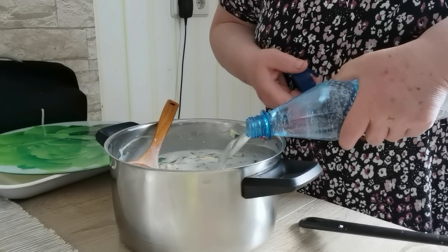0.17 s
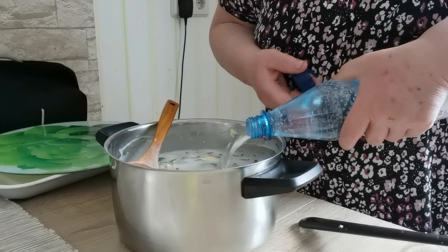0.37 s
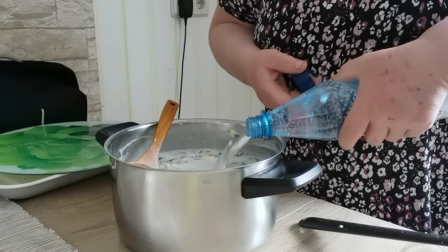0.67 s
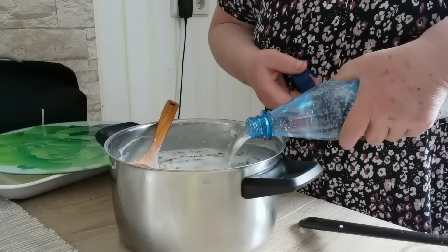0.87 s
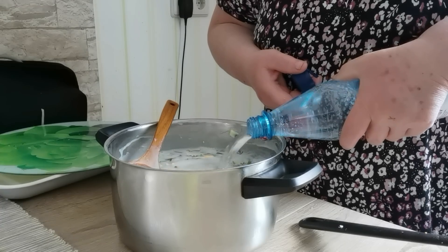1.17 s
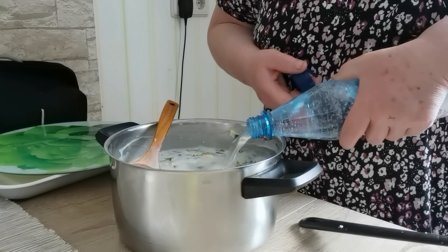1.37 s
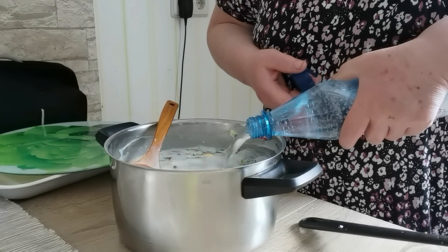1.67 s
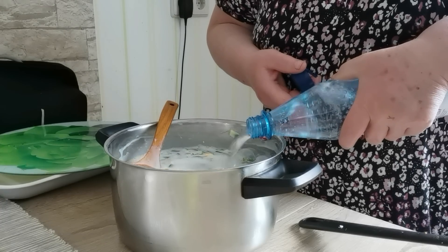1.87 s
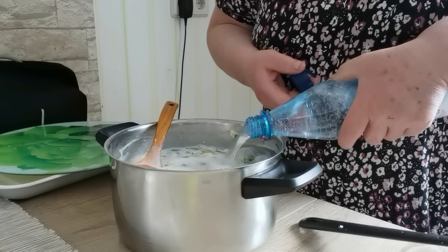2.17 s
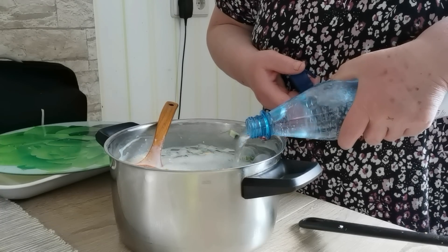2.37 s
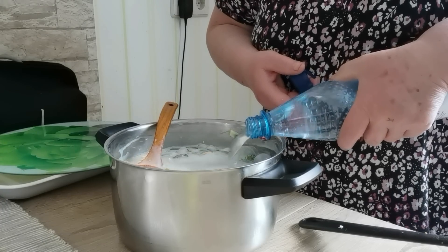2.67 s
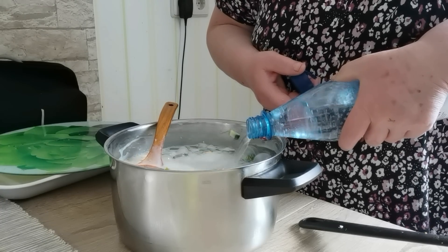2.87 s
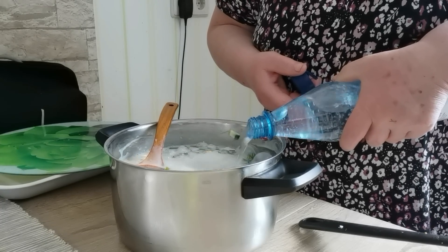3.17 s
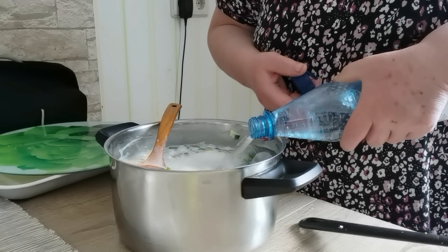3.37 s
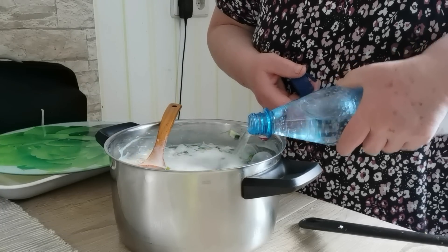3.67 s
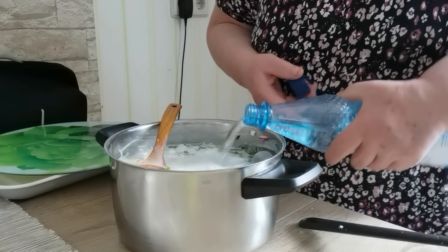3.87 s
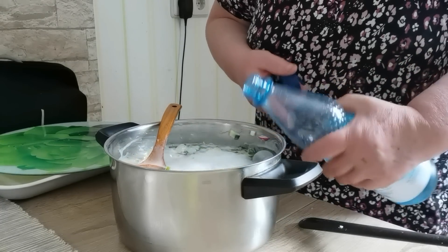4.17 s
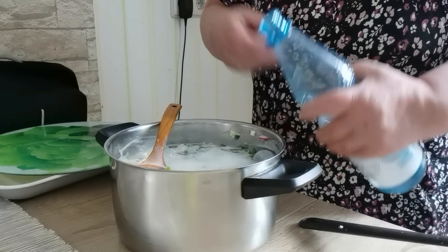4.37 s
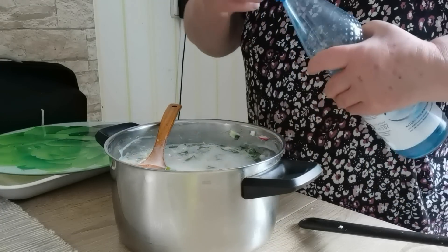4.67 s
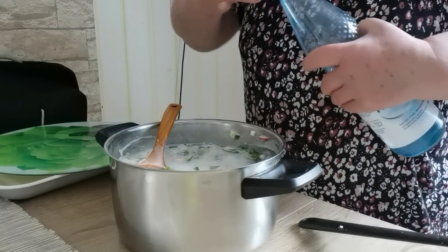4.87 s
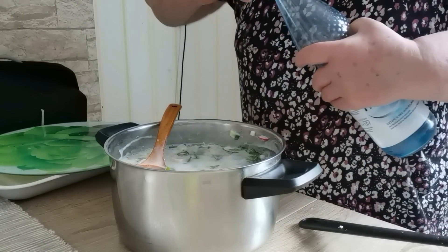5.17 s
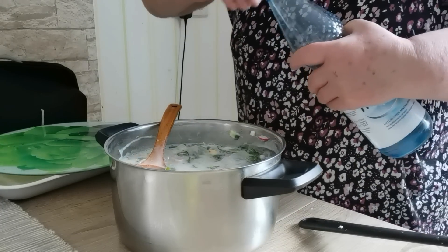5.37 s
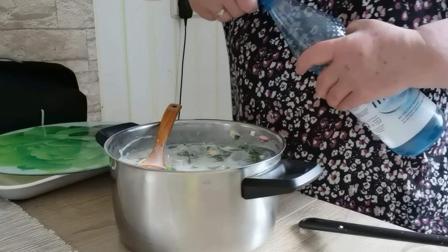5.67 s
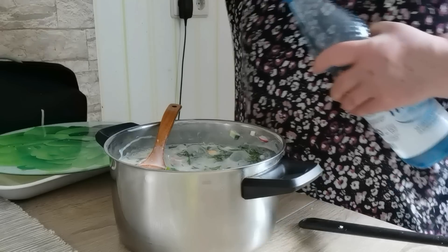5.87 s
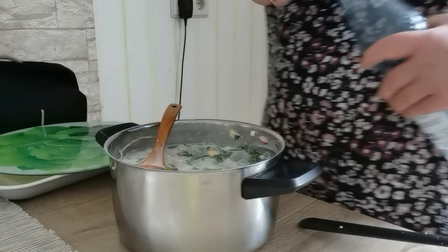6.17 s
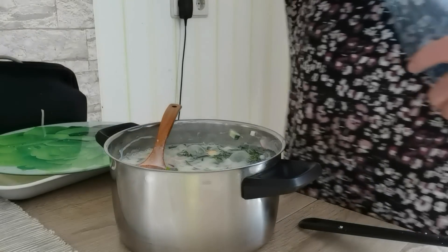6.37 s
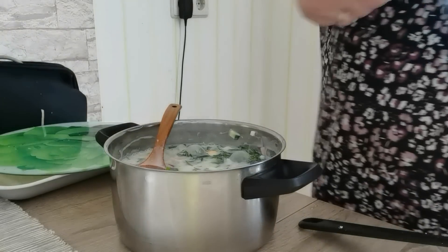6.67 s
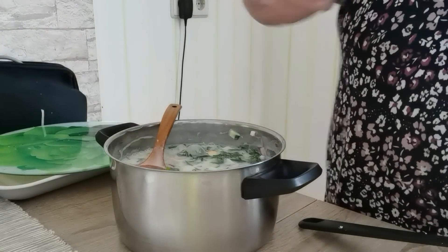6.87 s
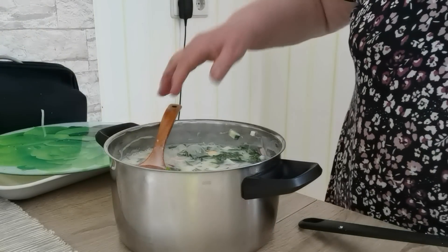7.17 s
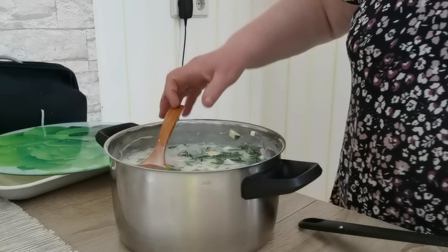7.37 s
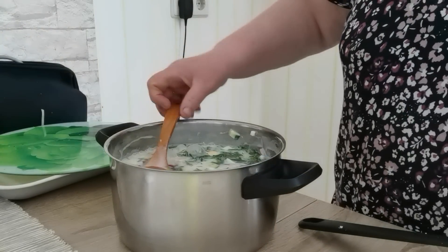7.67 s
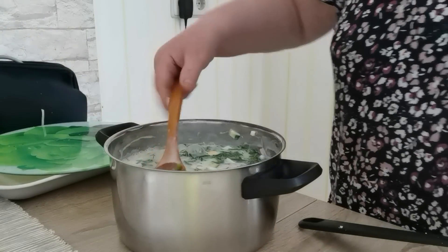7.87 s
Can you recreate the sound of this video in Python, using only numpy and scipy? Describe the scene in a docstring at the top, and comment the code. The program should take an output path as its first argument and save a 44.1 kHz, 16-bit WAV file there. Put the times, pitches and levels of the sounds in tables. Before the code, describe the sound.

Low, rounded gulps of water pour from a plastic bottle over fine foam hiss and small bubble chirps. Pouring stops; water gurgles back, and the hollow plastic cap knocks, snaps and squeaks as it is twisted. A heavy, chattering thud rings the counter, followed by soft wooden bumps. Close stereo microphone, short room reverberation, quiet low room tone.

```python
"""A small, live kitchen: sparkling water glugs from a plastic bottle into a steel pot of cold soup.
Gulps of air are decaying resonances, bubbles are rising chirps, and the fizz is filtered random ticks.
The bottle is righted with a slosh of gliding tones; its cap goes on with plastic clicks and thread noise.
It is set down hard on the counter to the right, which rings in its modes.
A wooden spoon starts to stir, with dull knocks on the pot."""
import sys
import numpy as np
from scipy import signal
from scipy.fft import rfft, irfft, next_fast_len
from scipy.io import wavfile
from scipy.ndimage import uniform_filter1d

SR = 44100
rng = np.random.default_rng(int(sys.argv[2]) if len(sys.argv) > 2 else 0)


def log_audio(samples):
    """Write samples as a 16-bit WAV file to the path given in sys.argv[1]."""
    # one column per channel
    frames = np.atleast_2d(samples).T
    # limit to full scale, then quantise
    limited = np.clip(frames, -1, 1)
    pcm = np.round(limited * 32767).astype(np.int16)
    wavfile.write(sys.argv[1], SR, pcm)


N = 354123  # length [samples]


def amp(db):
    """Level: decibels become an amplitude ratio."""
    return 10 ** (np.asarray(db) / 20)


def unit(x):
    """Normalisation: x at rms 1."""
    return x / np.sqrt(np.mean(x ** 2) + 1e-20)


def along(points, hz):
    """Logarithmic frequency scale: (frequency [Hz], value) points interpolated at hz."""
    point_hz, values = np.transpose(points)
    return np.interp(np.log(hz + 1), np.log(point_hz + 1), values)


def filtered(x, response):
    """Linear filtering: the spectrum of x times a response of frequency."""
    n = x.shape[-1]
    padded = next_fast_len(n + SR // 10)
    spectrum = rfft(x, padded) * response(np.fft.rfftfreq(padded, 1 / SR))
    return irfft(spectrum, padded)[..., :n]


def coloured(x, spectrum):
    """Spectral shaping: x with a (frequency [Hz], level [dB]) colour, at rms 1."""
    return unit(filtered(x, lambda hz: amp(along(spectrum, hz))))


def snap(spectrum, tilt=((1, 0),), size=4096):
    """Minimum-phase impulse: a causal click of this spectrum, energy 1 before the tilt."""
    hz = np.fft.rfftfreq(size, 1 / SR)
    magnitude = unit(amp(along(spectrum, hz))) * amp(along(tilt, hz))
    cepstrum = irfft(np.log(magnitude))
    # folding the cepstrum onto positive time makes the click causal
    fold = 1 + np.sign(size // 2 - np.arange(size))
    fold[0] = 1
    return irfft(np.exp(rfft(cepstrum * fold)))


def ring(hz, t60, rise=0):
    """Damped oscillation: a dying sine whose pitch climbs by the share rise in each t60 [s]."""
    t = np.arange(int(t60 * SR * 2)) / SR
    phase = 2 * np.pi * hz * t * (1 + rise * t / t60 / 2)
    return np.sin(phase) * np.exp(-np.log(1000) * t / t60)


def glide(length, start_hz, end_hz, rough_hz=0):
    """Frequency modulation: a softly gated tone whose pitch slides and trembles."""
    n = int(length * SR)
    tremble = unit(uniform_filter1d(rng.standard_normal(n), size=40))
    hz = np.linspace(start_hz, end_hz, n) + rough_hz * tremble
    return signal.windows.tukey(n, .6) * np.sin(2 * np.pi * np.cumsum(hz) / SR)


def crackle(length, rate):
    """Decaying impulse train: a first tick and random smaller ones within 0.1 s, of energy 1."""
    t = np.arange(SR // 10) / SR
    present = rng.random(len(t)) < rate / SR
    ticks = present * rng.standard_normal(len(t)) * np.exp(-2 * t / length)
    ticks[0] = 1
    return ticks / np.linalg.norm(ticks)


def grains(rate, spread_db):
    """Shot noise: two channels of random ticks of uneven size, rate a second."""
    present = rng.random((2, N)) < rate / SR
    size = rng.standard_normal((2, N))
    return present * size * amp(spread_db * rng.standard_normal((2, N)))


def swell(at_s, rise_s, release_s):
    """Exponential envelope: a gain that grows to 1 at at_s and dies away again."""
    t = np.arange(N) / SR - at_s
    return np.exp(np.minimum(t / rise_s, -t / release_s))


def add(out, s, x):
    """Superposition: x is mixed into out from time s on."""
    part = out[..., max(round(s * SR), 0):][..., :x.shape[-1]]
    part += x[..., :part.shape[-1]]


# likeness of left and right in sound from all round: (frequency [Hz], likeness [0-1])
LIKENESS = [(60, 0.7), (250, 0.9), (500, 0.67), (1000, 0.014), (16000, 0)]


def diffuse(pair):
    """Interaural coherence: two unrelated signals become a pair alike mainly in the bass."""
    def mid_side(hz):
        angle = np.arccos(np.clip(along(LIKENESS, hz), -1, 1)) / 2
        return np.array([np.cos(angle), np.sin(angle)])
    mid, side = filtered(pair, mid_side)
    return np.array([mid + side, mid - side])


# reverberation time of the kitchen: (frequency [Hz], t60 [s])
KITCHEN_T60 = [(80, 0.39), (200, 0.53), (500, 0.46), (2000, 0.48), (6000, 0.4), (15000, 0.25)]


def kitchen(x, wet_db, lead_ms, left_db):
    """Room response: direct sound, two reflections and a decaying diffuse tail.

    The direct sound reaches the left lead_ms sooner; left_db is the level of left over right."""
    hz, t, noise = signal.stft(rng.standard_normal((2, SR * 2 // 3)), SR, nperseg=256)
    colour = amp(along([(4000, 1.0), (10000, -3.5)], hz))[:, None]
    onset = (1 - np.exp(-t / 0.0025)) * colour
    decay = np.exp(-np.log(1000) * t / along(KITCHEN_T60, hz)[:, None])
    tail = diffuse(signal.istft(noise * onset * decay, SR, nperseg=256)[1])
    out = amp(wet_db) * signal.fftconvolve(x[None], tail / np.linalg.norm(tail[0]), axes=1)
    sides = np.array([[.5], [-.5]])
    lag = np.maximum(-2 * sides * lead_ms, 0) / 1000  # [s]
    direct = filtered(x, lambda f: np.exp(-2j * np.pi * f * lag))
    add(out, 0, direct)
    for delay, db in [(.0095, -13.5), (.0245, -16)]:  # the wall behind and the far wall
        add(out, delay, amp(db) * direct)
    return out * amp(sides * left_db)


# colour of the room air: (frequency [Hz], level [dB])
ROOM_AIR = [(20, -48), (48, -16), (75, -5.5), (130, 0), (250, -3.5), (420, -13.5), (750, -12), (950, -22.5),
            (2500, -19), (4000, -19), (16000, -19)]
# hum of an appliance: (frequency [Hz], level [dB])
APPLIANCE_HUM = [(49, -67), (203, -67), (700, -76)]


def background():
    """Diffuse noise and phase drift: room air and a faint, slightly unsteady hum."""
    t = np.arange(N) / SR
    air = amp(-62.5) * coloured(diffuse(rng.standard_normal((2, N))), ROOM_AIR)
    left_db = [(1000, -1.5), (5000, -1.5), (9000, 4.5)]  # left over right, by frequency
    out = filtered(air, lambda hz: amp(np.array([[.5], [-.5]]) * along(left_db, hz)))
    for hz, db in APPLIANCE_HUM:
        drift = np.cumsum(rng.standard_normal(N)) * 3 / np.sqrt(SR)
        out += amp(db) * np.sin(2 * np.pi * hz * t + drift)
    return out


# colour of the bursting foam: (frequency [Hz], level [dB])
FOAM_COLOUR = [(300, 8), (1000, -7.5), (1600, 2), (2800, 2), (4000, 0.5), (9000, 2), (16000, 2.5)]
# reflections from the steel walls of the pot: (delay [s], level [dB])
POT_REFLECTIONS = [(.0007, -17.5), (.0014, -20), (.0031, -13.5)]
FIZZ_DB, POUR_END_S = -59.5, 3.9  # the foam at its fullest, before the side gains, and when
FOAM_GROWS_DB_PER_S, FOAM_SETTLES_DB_PER_S, FLAT_DB = 0.67, 3.5, -73  # FLAT_DB is the floor


def fizz():
    """Shot noise and comb filtering: tiny bubbles burst, louder as foam builds, softer as it settles."""
    t = np.arange(N) / SR - POUR_END_S
    change_db = np.minimum(FOAM_GROWS_DB_PER_S * t, -FOAM_SETTLES_DB_PER_S * t)
    level_db = np.maximum(FIZZ_DB + change_db, FLAT_DB)
    foam = coloured(grains(rate=7000, spread_db=-1.5), FOAM_COLOUR)

    def pot(hz):
        # the steel walls throw every burst back within milliseconds
        return 1 + sum(amp(db) * np.exp(-2j * np.pi * hz * delay) for delay, db in POT_REFLECTIONS)
    return amp(level_db) * unit(filtered(foam, pot)) * amp([[2], [-3.2]])  # left, right


# larger bubbles in the soup: (time [s], level [dB], pitch [Hz])
BUBBLE_PINGS = [(.08, -65, 915), (.857, -57, 1055), (1.969, -43, 6030), (2.005, -56, 774),
                (2.17, -58.5, 880), (2.28, -53.5, 1400), (3.715, -53.5, 840)]
PING_T60_S, PING_RISE_HZ = 0.026, 167


def bubbles():
    """Bubble resonance: the stream trickles in small rising chirps; a few larger bubbles ping."""
    trickle = np.zeros(N)
    for when, size, strength in rng.random(size=(70, 3)):
        chirp = ring(1500 * 2 ** size, 0.023, rise=0.16)
        add(trickle, .8 + 3 * when, amp(-71.5 + 11.3 * strength) * chirp)
    out = kitchen(trickle, wet_db=3.5, lead_ms=0, left_db=-5)[:, :N]
    for s, db, hz in BUBBLE_PINGS:
        ping = ring(hz, PING_T60_S, rise=PING_RISE_HZ / hz)
        add(out, s, amp(db) * kitchen(ping, wet_db=8.5, lead_ms=0, left_db=1.0))
    return out


# air gulps in the bottle neck, about four a second: (time [s], level [dB])
GULPS = [(.156, -39.5), (0.382, -41), (.666, -39.5), (.930, -39), (1.186, -43), (1.450, -39.5),
         (1.733, -41.5), (1.969, -42), (2.25, -40), (2.26, -31.5), (2.526, -36.5), (2.797, -39.5),
         (3.059, -47), (3.091, -40), (3.362, -32.5), (3.632, -31.5)]
# the bottle is tipped further halfway through the pour: (time [s], flow [0-1])
POUR_FLOW = [(0, 0.27), (1.95, 0.24), (2.26, 0.98), (3.63, 1)]
# colour of splashing water: (frequency [Hz], level [dB])
SPLASH_COLOUR = [(300, -18), (1050, -16), (1450, -7.5), (2000, -17.5), (2600, -17), (4000, -25),
                 (9000, -31), (16000, -22.5)]
GULP_HZ, GULP_HZ_PER_FLOW, GULP_T60_S = 220, 65.4, 0.03
NECK_DB, NECK_DB_PER_FLOW = -16, 7.5  # the neck's snap, re the gulp
SPLASH_DB, SPLASH_DB_PER_FLOW, DROPLETS_DB = -12, 15.5, -5  # splash re the gulp, droplets re the splash
BREAKUP_S, BREAKUP_DB = .07, -17.5  # spread of the smaller bubbles in time; the strongest, re the gulp
AIR_THUMP_DB, AIR_THUMP_T60_S = -18, 0.066  # the air behind the water, re the gulp


def glugs():
    """Cavity resonance: each gulp of air kicks the bottle's cavity and breaks up into smaller bubbles.

    The neck snaps shut and water splashes; more flow is higher and brighter."""
    out = np.zeros((2, N))
    cavity = signal.butter(3, [100, 1000], "bandpass", fs=SR, output="sos")
    for s, db in GULPS:
        flow = np.interp(s, *np.transpose(POUR_FLOW))
        hz = GULP_HZ + GULP_HZ_PER_FLOW * flow
        neck_db = NECK_DB + NECK_DB_PER_FLOW * flow
        splash_db = SPLASH_DB + SPLASH_DB_PER_FLOW * flow
        gulp = np.zeros(SR // 2)
        add(gulp, 0, -ring(hz, GULP_T60_S, rise=0.1))
        add(gulp, 0, -amp(AIR_THUMP_DB) * ring(AIR_COLUMN_NOTE[0][1], AIR_THUMP_T60_S))
        add(gulp, 0, -amp(neck_db) * ring(748, 0.027, rise=0.12))
        add(gulp, 0, -amp(neck_db - 2.0) * ring(550, 0.021))
        add(gulp, .02, amp(-15.0) * ring(202.3, 0.18))
        for when, size in rng.random(size=(3, 2)):
            small_bubble = ring(hz * 2.37 ** size, 0.035, rise=0.11)
            add(gulp, 0.012 + BREAKUP_S * when, amp(BREAKUP_DB - 4.3 * size) * small_bubble)
        gulp = signal.sosfilt(cavity, gulp)
        splash = signal.fftconvolve(crackle(0.0027, rate=1400), snap(SPLASH_COLOUR))
        add(gulp, 0, amp(splash_db) * splash)
        # droplets thrown up by the gulp fall back
        droplets = signal.fftconvolve(crackle(0.25, rate=680), snap(SPLASH_COLOUR))
        add(gulp, .06, amp(splash_db + DROPLETS_DB) * droplets)
        add(out, s, amp(db) * kitchen(gulp, wet_db=0.5, lead_ms=0.11, left_db=0.5))
    return out


# colour of the foam inside the bottle: (frequency [Hz], level [dB])
BOTTLE_FOAM_COLOUR = [(500, -12), (1100, -5), (2000, -6), (2550, 2), (3300, -4), (3900, -5), (5000, -17),
                      (9000, -30)]
BOTTLE_FIZZ_DB, BOTTLE_FIZZ_AT_S = -61.5, 4.96  # at its fullest, and when


def bottle_fizz():
    """Shot noise: the water left in the bottle foams up around its righting, then calms."""
    foam = coloured(grains(rate=1500, spread_db=2), BOTTLE_FOAM_COLOUR)
    return amp(BOTTLE_FIZZ_DB) * swell(BOTTLE_FIZZ_AT_S, rise_s=0.81, release_s=0.4) * foam


# note of the air in the bottle, rising as water clears the neck, sinking as the cap covers it:
# (time [s], pitch [Hz])
AIR_COLUMN_NOTE = [(3.83, 122.2), (3.95, 144.6), (4.03, 193.7), (4.87, 185.4), (5.02, 153.6), (5.27, 140.3),
                   (5.55, 126)]
# jolts that make that air boom: (time [s], length [s], level [dB])
AIR_BOOMS = [(3.70, 0.16, -57), (3.83, 0.08, -43.5), (3.95, 0.061, -44), (3.98, 0.198, -57.5),
             (4.24, 0.084, -61), (4.76, 0.14, -62), (4.885, 0.13, -51.5), (5.19, .09, -50),
             (5.542, 0.068, -42.5), (5.921, 0.023, -47), (6.113, 0.065, -53)]
# water gurgles back from the neck: (time [s], length [s], level [dB], starting pitch [Hz])
NECK_GURGLES = [(3.895, 0.051, -43, 210), (3.90, 0.065, -54.5, 351), (3.922, 0.022, -38.5, 125),
                (5.305, 0.036, -44, 299)]
GURGLE_SAG = 0.22  # share by which the pitch falls


def slosh():
    """Air resonance: each jolt sounds the air above the water, which gurgles back into the bottle."""
    out = np.zeros(N)
    for s, length, db in AIR_BOOMS:
        start_hz, end_hz = np.interp([s, s + length], *np.transpose(AIR_COLUMN_NOTE))
        add(out, s, amp(db) * glide(length, start_hz, end_hz, rough_hz=19))
    for s, length, db, hz in NECK_GURGLES:
        add(out, s, amp(db) * glide(length, hz, hz * (1 - GURGLE_SAG), rough_hz=23))
    return kitchen(out, wet_db=-10.0, lead_ms=0, left_db=0.5)[:, :N]


# resonances of the cap on the neck: (frequency [Hz], width [Hz], lift [dB])
CAP_RESONANCES = [(607, 76, 9.5), (1240, 400, 3), (1740, 350, 4), (2880, 380, 5.5), (4970, 270, 3.5)]


def shell(f):
    """Modal resonance: the response of the cap on the neck at frequency f."""
    response = 1
    for hz, width, db in CAP_RESONANCES:
        damping = 1j * f * width
        response = response * (1 + (amp(db) - 1) * damping / (hz * hz - f * f + damping))
    return response


# colour of a plastic contact: (frequency [Hz], level [dB])
PLASTIC_COLOUR = [(50, -30), (130, 5.5), (400, -6.5), (900, -8.5), (1400, -3.5), (3000, -6.5), (4200, -7),
                  (9000, -16.5), (16000, -10.5)]


def plastic(length, bass_db, treble_db):
    """Impact excitation: one crackling contact of plastic excites the cap, heard in the kitchen."""
    tilt = [(250, bass_db), (900, 0), (2000, 0), (8000, treble_db)]
    click = snap(PLASTIC_COLOUR, tilt=tilt)
    burst = filtered(signal.fftconvolve(crackle(length, rate=3500), click), shell)
    return kitchen(burst, wet_db=-0.24, lead_ms=-0.019, left_db=1.5)


# sharp snaps of plastic: (time [s], level [dB], treble tilt [dB])
PLASTIC_SNAPS = [(4.793, -32, 14), (5.317, -12.5, 1.5), (5.467, -23, -7), (5.5185, -9, -14.5),
                 (6.093, -15.5, -13), (6.496, -29, -24), (6.648, -21.5, 4.5)]
SNAP_S, SNAP_BASS_DB = 0.0053, -11.5
# hollow knocks of cap and fingers on the neck: (time [s], level [dB], treble tilt [dB], length [s])
NECK_KNOCKS = [(4.894, -29, -1, 0.015), (5.054, -24, -5, 0.02), (5.18, -15.5, -0.5, 0.049),
               (5.302, -21.5, -0.5, 0.016), (5.528, -24, 2, 0.021), (5.544, -8.5, -11, 0.013),
               (5.924, -20.5, -42, 0.0094), (6.113, -22, -11, 0.0068), (6.146, -14.5, -14, 0.014),
               (6.402, -32, -28, .008)]
KNOCK_BASS_DB = -0.5
WALL_TICK_S, WALL_TICK_DB, WALL_TICK_HZ, WALL_CRACKLE_DB = 4.254, -42.5, 3300, -35.5


def cap():
    """Impact sound: the bottle's wall pops in the grip; the cap knocks and snaps onto the neck."""
    out = np.zeros((2, N))
    tick = kitchen(ring(WALL_TICK_HZ, .009), wet_db=1.5, lead_ms=0, left_db=5.0)
    add(out, WALL_TICK_S, amp(WALL_TICK_DB) * tick)
    add(out, WALL_TICK_S, amp(WALL_CRACKLE_DB) * plastic(.07, bass_db=9, treble_db=17))
    for s, db, treble_db in PLASTIC_SNAPS:
        add(out, s, amp(db) * plastic(SNAP_S, SNAP_BASS_DB, treble_db))
    for s, db, treble_db, length in NECK_KNOCKS:
        add(out, s, amp(db) * plastic(length, KNOCK_BASS_DB, treble_db))
    return out


# turns of the cap: (time at the tightest [s], rasp level [dB], rise [s],
# level of the drag before it [dB], hiss level [dB])
CAP_TURNS = [(6.096, -39.5, 0.0075, -55, -43.5), (6.603, -40, 0.03, -63, -41)]
# squeaks of the thread: (time [s], length [s], level [dB], start pitch [Hz], end pitch [Hz])
THREAD_SQUEAKS = [(5.05, 0.067, -57.5, 626, 630), (5.588, .11, -56, 599, 715),
                  (6.076, 0.061, -39.5, 1586, 1273), (6.081, 0.062, -56, 4970, 5200),
                  (6.491, 0.0072, -37, 1370, 1330), (6.52, 0.062, -45, 1195, 1594),
                  (6.567, 0.059, -48, 1507, 2000)]
# colour of the thread's rasp: (frequency [Hz], level [dB])
RASP_COLOUR = [(100, -8.5), (400, -12.5), (650, -11), (950, -5), (1400, 0.5), (2000, -1), (3000, -7.5),
               (5000, -9), (10000, -31)]
# colour of fingers sliding off the cap: (frequency [Hz], level [dB])
HISS_COLOUR = [(1000, -15), (2600, -5), (3700, -3), (5000, -5), (7000, 2), (9500, 1.5), (12500, 10),
               (16000, 14)]
DRAG_S, RASP_RELEASE_S, SQUEAK_ROUGH_HZ = .16, 0.032, 110
HISS_LAG_S, HISS_RISE_S, HISS_RELEASE_S, DRAG_HISS_DB = 0.047, .032, 0.018, -2  # last: re the drag


def thread():
    """Stick-slip friction: each turn drags lightly, then tightens in tiny slips; the thread squeaks.

    The fingers slide off with a hiss."""
    t = np.arange(N) / SR
    rasp_gain, hiss_gain = np.zeros((2, N))
    for s, db, rise_s, drag_db, hiss_db in CAP_TURNS:
        drag = amp(drag_db) * ((t > s - DRAG_S) & (t < s))
        rasp_gain += drag + amp(db) * swell(s, rise_s, RASP_RELEASE_S)
        slide_off = swell(s + HISS_LAG_S, HISS_RISE_S, HISS_RELEASE_S)
        hiss_gain += amp(DRAG_HISS_DB) * drag + amp(hiss_db) * slide_off
    slips = grains(rate=1700, spread_db=3)
    rasp = unit(filtered(coloured(slips[0], RASP_COLOUR), shell))
    rub = rasp_gain * rasp + hiss_gain * coloured(slips[1], HISS_COLOUR)
    for s, length, db, start_hz, end_hz in THREAD_SQUEAKS:
        add(rub, s, amp(db) * glide(length, start_hz, end_hz, rough_hz=SQUEAK_ROUGH_HZ))
    return kitchen(rub, wet_db=-3.5, lead_ms=-.11, left_db=1)[:, :N]


# the spoon nudges the pot: (time [s], level [dB])
SPOON_KNOCKS = [(7.324, -33.5), (7.926, -26), (7.944, -33), (7.971, -35.5), (8.0, -31.5)]
# colour of a soft wooden knock: (frequency [Hz], level [dB])
WOOD_COLOUR = [(40, -39), (125, 6.5), (260, -1), (450, -7.5), (700, -28), (1200, -32.5), (8000, -36)]


def spoon():
    """Damped impact: dull knocks of wood, muffled by the soup."""
    out = np.zeros((2, N))
    for s, db in SPOON_KNOCKS:
        add(out, s, amp(db) * kitchen(snap(WOOD_COLOUR), wet_db=9, lead_ms=0.12, left_db=0.0))
    return out


# the bottle's foot chatters on the counter: (time [s], level [dB], extra level of the crack [dB])
FOOT_STRIKES = [(7.423, 0, 1), (7.431, 6, -24), (7.4423, -6, 4.5), (7.454, -4, -3), (7.467, -1, -13.5)]
# modes rung by each strike, of the counter and the pot on it, and near 200 Hz of the kitchen itself: (frequency
# [Hz], level re the strike [dB], t60 [s])
STRIKE_MODES = [(127, -37.5, 0.44), (193, -30.5, .5), (204.8, -30, 0.72), (233.5, -28, .3),
                (263.3, -31, 0.3), (309, -30.5, .33), (341.4, -38.5, 0.5), (435, -38, 0.19),
                (525, -43.5, 0.21), (598, -46, 0.12), (706, -43, 0.28), (875, -48, 0.46),
                (1250, -39, 0.33), (1297, -44, 0.29), (1550, -41, 0.42), (1765, -39, 0.21),
                (2660, -37.5, 0.1), (2918, -52, 0.14)]
# colour of the crack of each strike: (frequency [Hz], level [dB])
CRACK_COLOUR = [(40, -11), (100, -3.5), (160, -9.5), (270, 1.5), (450, -8.5), (650, -8), (900, -13),
                (1400, -9), (2200, -22), (2800, -25), (3800, -32), (6000, -35.5), (9000, -45.5),
                (16000, -47)]


def landing():
    """Modal excitation: the counter swings for about four cycles as the bottle's foot chatters on it.

    Every strike rings the modes of counter and pot and a low resonance of the kitchen; a thin high ring follows
    the jolt."""
    boom, clatter, out = np.zeros(SR), np.zeros(SR), np.zeros((2, N))
    start = FOOT_STRIKES[0][0]
    for s, db, crack_db in FOOT_STRIKES:
        add(clatter, s - start, amp(db + crack_db - 0.5) * snap(CRACK_COLOUR))
        for hz, mode_db, t60 in STRIKE_MODES:
            add(boom, s - start, -amp(db + mode_db) * ring(hz, t60))
    swing = kitchen(glide(0.05, 86, 91), wet_db=-27.0, lead_ms=-0.39, left_db=-1.5)
    add(out, 7.419, -amp(-13.5) * swing)
    add(out, start, kitchen(boom, wet_db=-8.0, lead_ms=-0.28, left_db=0.5))
    add(out, start, kitchen(-clatter, wet_db=7, lead_ms=-0.396, left_db=0.5))
    high_ring = glide(0.042, 10000, 9900, rough_hz=426)
    add(out, 7.45, amp(-50.0) * kitchen(high_ring, wet_db=6.5, lead_ms=0, left_db=10))
    return out


def scene():
    """Superposition: pouring, capping, setting down and stirring."""
    pouring = background() + fizz() + bubbles() + glugs()
    capping = bottle_fizz() + slosh() + cap() + thread()
    return pouring + capping + spoon() + landing()


# treble resonances of the microphone's ports: (frequency [Hz], level [dB])
MICROPHONE_RESPONSE = [(4000, -1), (5500, 7.5), (6800, -0.5), (7700, -2.5), (8500, 10), (9200, 17),
                       (10000, 9.5), (11000, 5), (15500, 0)]
TOP_HZ = 15870  # band limit


def record(dry):
    """Transducer response: the microphone sheds deep bass, its ports resonate, and the band is limited."""
    thinned = signal.sosfilt(signal.butter(2, 35, "highpass", fs=SR, output="sos"), dry)
    return filtered(thinned, lambda hz: amp(along(MICROPHONE_RESPONSE, hz)) * (hz < TOP_HZ))


dry = scene()
out = record(dry)
log_audio(out)
```